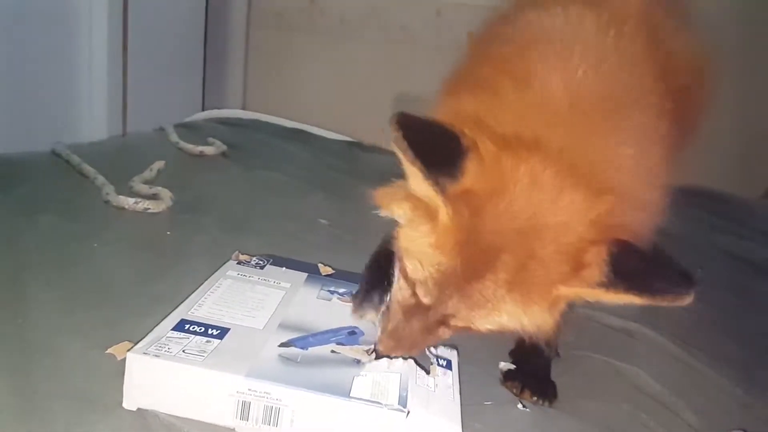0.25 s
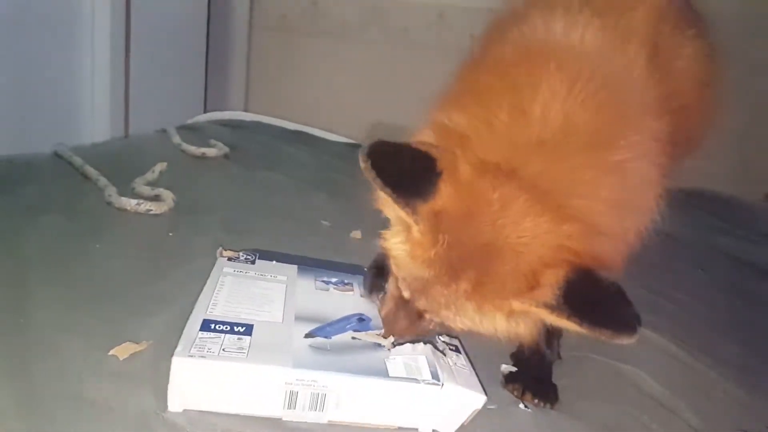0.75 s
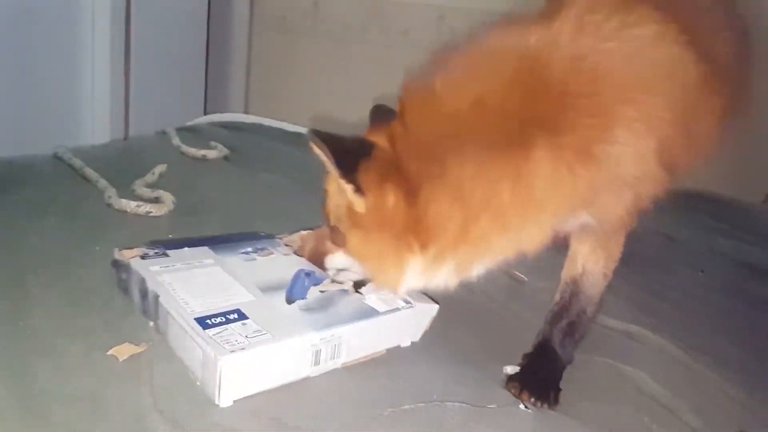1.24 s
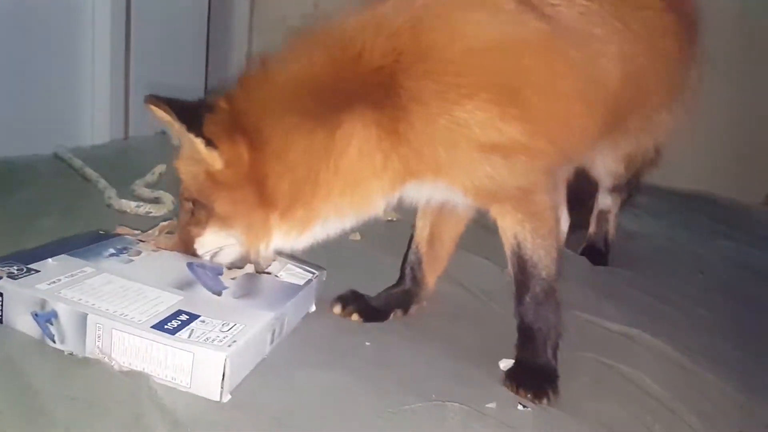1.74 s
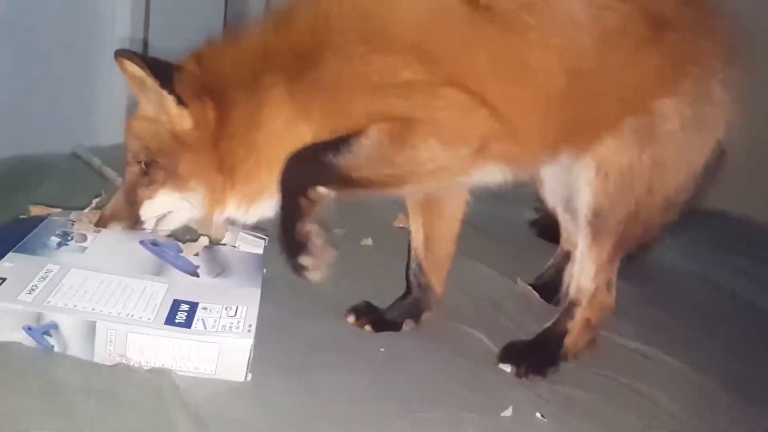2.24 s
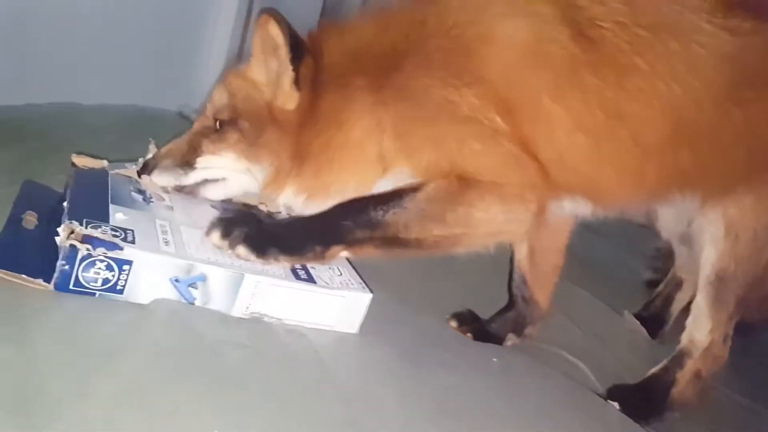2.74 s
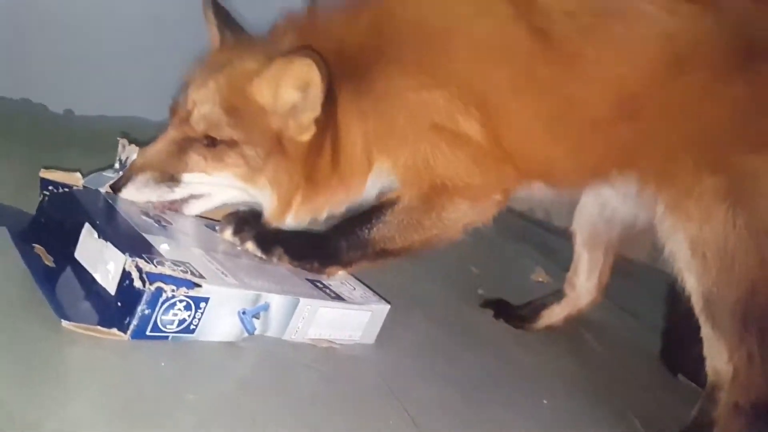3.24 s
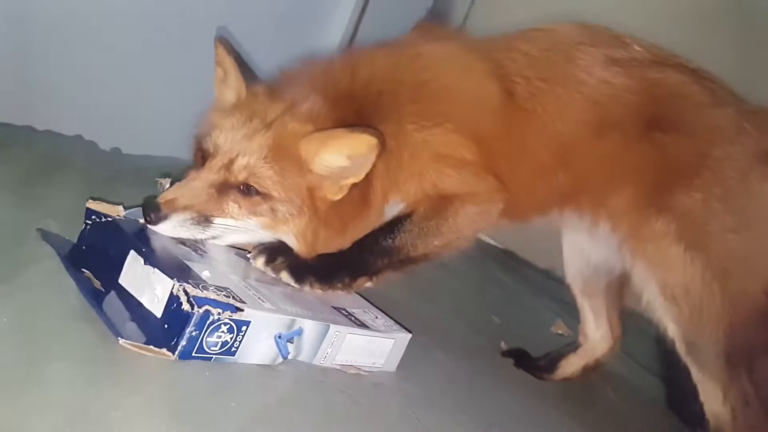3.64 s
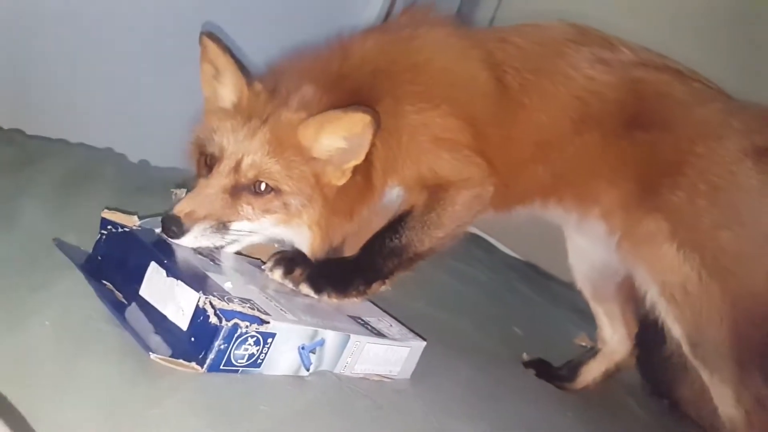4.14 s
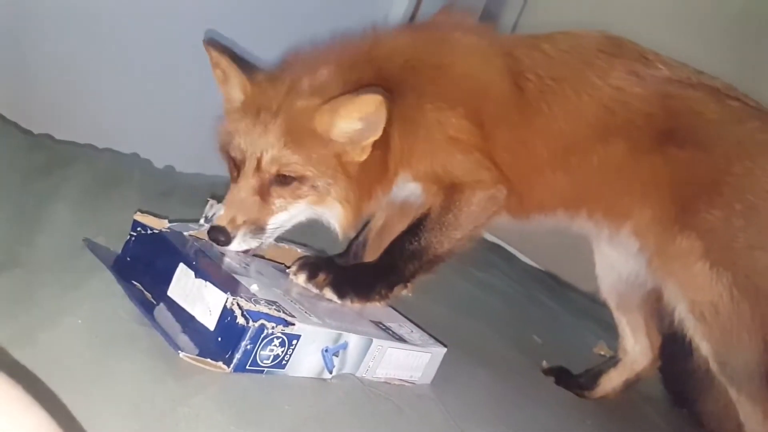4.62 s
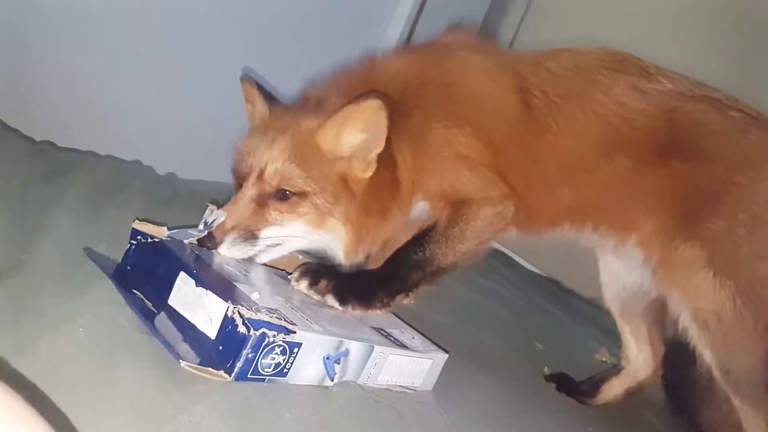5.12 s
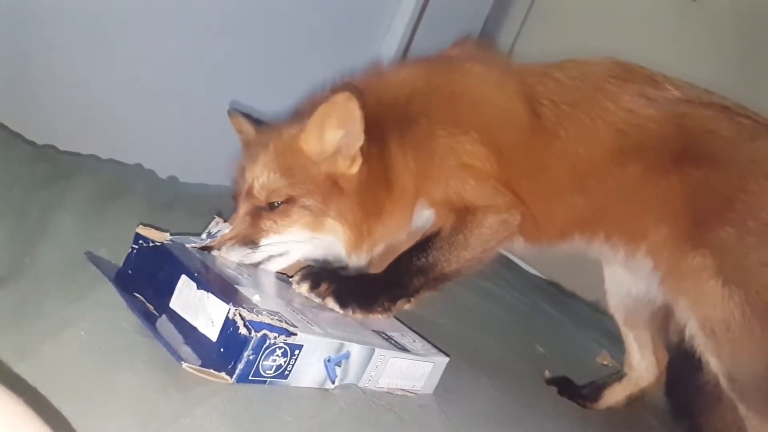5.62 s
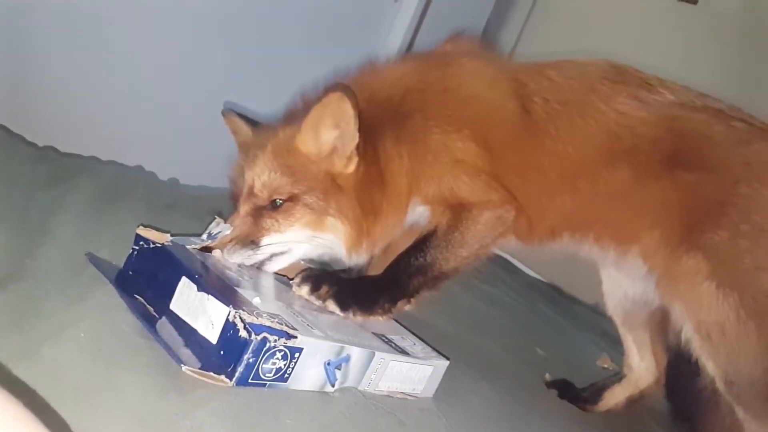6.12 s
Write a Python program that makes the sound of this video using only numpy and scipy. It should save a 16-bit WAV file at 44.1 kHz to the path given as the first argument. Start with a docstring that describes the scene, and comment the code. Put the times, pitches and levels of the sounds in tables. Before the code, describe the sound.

A fox bites into a thin cardboard box, making a quick run of sharp cracks and hollow, creaking crackles. After a lull of soft rubbing, a second burst of snaps follows, then lighter chewing with dull thumps of paws and box on a mattress. Near the end the fox sniffs in short, faint puffs. The microphone is close, in a small, quiet room with a faint hum.

```python
"""Fox with a cardboard box

A fox on a mattress bites, folds and paws a thin cardboard box, close to a two-port phone microphone.
Fibres snap and creak into the box's modes, paws and box thump the mattress, fur and card rub on cloth.
Near the end the fox sniffs in short puffs. The room is small and quiet, with a faint hum."""
import sys
import numpy as np
from scipy import signal
from scipy.fft import rfft, irfft
from scipy.io import wavfile
from scipy.ndimage import uniform_filter1d

SR = 44100
rng = np.random.default_rng(int(sys.argv[2]) if len(sys.argv) > 2 else 0)


def digitize_waveform(pressure):
    """Quantize a signal to 16-bit integers and store it at the path in sys.argv[1].

    Rows of a 2-D input are taken as channels; values are limited to [-1, 1].
    """
    field = np.atleast_2d(pressure).T
    bounded = np.clip(field, -1, 1)
    quanta = np.round(bounded * 32767).astype(np.int16)
    wavfile.write(sys.argv[1], SR, quanta)


N = 280895
FFT_SIZE, SNAP_SAMPLES = 2 ** 19, 2048


def card_snaps():
    """Close up, fibres crack and strike hollow and panel; the tick is louder at the unshaded left port."""
    # (time [s], hollow level [dB], hollow pitch [Hz], panel level [dB], panel pitch [Hz],
    # tick level [dB], left minus right for panel and crack [dB])
    snaps = [(0.1697, -48.5, 377, -46.5, 1700, -66, -7.5), (0.1848, -48.5, 317, -40.5, 2140, -65, -4),
             (0.35, -54, 890, -8.5, 1570, -25, 0.5), (0.353, -37.5, 870, -13, 1565, -32.5, -2.0),
             (0.395, -24.5, 895, -18.5, 1800, -33.5, -8), (0.4381, -12.5, 590, -24, 915, -46, -4),
             (0.4448, -21, 740, -16, 1670, -53, -7), (0.4548, -15, 770, -33, 1320, -43, 1.5),
             (0.4708, -15, 614, -36, 1660, -30.5, 11), (0.4826, -14, 617, -25, 1210.0, -50, 0.0),
             (0.4919, -28, 880.0, -20.5, 923, -41, 8), (0.5059, -12, 590, -14, 1660, -30, -5),
             (0.5147, -35, 775, -13, 860, -30.5, 1), (0.5229, -29, 536, -24, 1350, -32, -2),
             (0.5516, -26, 600, -30, 1980, -46, 6), (0.59, -49, 580.0, -50, 1890, -41, -3),
             (0.6005, -41, 829, -29, 1900, -54, -1), (0.625, -41.5, 373, -49, 1680.0, -39.5, -3),
             (0.6418, -36.5, 584, -33.5, 1800, -38.5, 2), (0.7103, -41, 820.0, -38, 2160, -50.5, -6),
             (0.7511, -60, 750.0, -41.5, 870, -40.5, -3), (0.822, -34, 670, -32, 1060.0, -43, -2),
             (0.844, -52, 620, -48, 1240, -53, 3), (0.8897, -23, 416, -25.5, 1110, -40.5, -10),
             (0.901, -20.5, 387, -26.5, 1350, -50, -6), (0.9399, -25, 336, -22, 1680, -36, 1),
             (0.9593, -17, 776, -22.5, 1780, -40, -9), (0.979, -19, 456, -18.5, 1690, -31.5, 3),
             (1.004, -21.5, 640, -27.0, 930, -39.5, 5), (1.0257, -28, 490, -25.5, 1070, -52, 0.0),
             (1.058, -24.5, 330, -30, 950, -38, -1), (1.166, -45.5, 370.0, -42, 1877, -60, -3.0),
             (1.2874, -62, 736, -49, 1650, -44.5, 1), (1.3177, -64, 263, -53, 1505, -49.5, -13),
             (2.2644, -68, 450.0, -50, 2200, -51, -16), (2.4304, -61, 430.0, -44.5, 1530, -50, -18),
             (2.5467, -34, 310, -38, 1340.0, -54, 0.0), (2.5614, -49, 890, -15.5, 1594, -44, -3.5),
             (2.5704, -40, 340.0, -52, 1470, -60.0, -1.0), (2.677, -43.5, 740, -34.5, 920, -46, -5),
             (2.7555, -30.5, 516, -28, 1300, -67, -2), (2.9445, -24.5, 253, -33.5, 860, -38, -7),
             (2.9605, -19.5, 264, -15.5, 1660, -26, -14), (2.9716, -15, 530, -21.5, 1540, -56, 6),
             (3.1897, -45, 764, -38, 905, -39.5, -7), (3.3229, -47, 304, -36.5, 3830, -49, -9),
             (3.3854, -57, 302, -44, 2060, -42, -5), (3.3993, -29.5, 393, -32, 865, -28, -3.5),
             (3.4447, -28, 374, -43, 1060.0, -66, -4.0), (3.4757, -27, 345, -39.5, 880, -64, 5),
             (3.543, -34.5, 410, -45, 1420, -28, 0), (3.5474, -30.5, 384, -21.5, 1400, -35, -2),
             (3.6035, -46, 820, -41, 1270, -49, -4), (3.716, -35.5, 397, -58, 900.0, -62.0, 3),
             (3.8073, -46, 460, -58, 1690, -45.5, 4), (3.8509, -37, 267, -60, 900.0, -67, -1.0),
             (3.8955, -42.5, 260.0, -51, 1200, -48, -7), (3.9404, -41, 260.0, -54, 900.0, -64, -4.0),
             (3.9893, -39.5, 390, -62, 900.0, -63.0, 0.0), (4.1518, -37, 400, -52, 980, -61, -2.0),
             (4.2087, -40, 545, -51, 900, -55, -7), (4.236, -29.5, 623, -39, 1000, -60, -1),
             (4.3892, -43, 282, -61, 900.0, -67.0, -3), (4.5311, -37, 382, -32, 1290, -53, -6),
             (4.874, -46, 470.0, -54, 1160.0, -72, -11), (4.9244, -55.5, 325, -55, 1310.0, -45, -8.5),
             (5.0528, -69.5, 403, -69.5, 950.0, -55, 1), (5.3787, -48, 349, -48.5, 1640, -54.5, -5),
             (5.7326, -37, 570, -39, 1049, -68, -8.0)]
    out = np.zeros((2, N))
    noises = rng.standard_normal((len(snaps), 4, SNAP_SAMPLES))
    for (s, hollow_db, hollow_hz, panel_db, panel_hz, tick_db, pan_db), noise in zip(snaps, noises):
        hollow = gain_of(hollow_db) * box_knock(hollow_hz, cycles=1.0, ring_share=0.26, detune=noise[0])
        panel = box_knock(panel_hz, cycles=1.98, ring_share=0.22, detune=noise[0, ::-1])
        crack_db = 0.71 * panel_db + 0.46 * tick_db + 4.0  # brittle breaks both tick and crack hard
        card = gain_of(panel_db) * panel + gain_of(crack_db) * fibre_crack(noise[1])
        tick = gain_of(tick_db) * fibre_tick(noise[2:])
        pan = gain_of(pan_db / 2)
        add(out[0], s, hollow * gain_of(-2.0) + card * pan + tick[0] * gain_of(2.0))
        add(out[1], s + 3 / SR, hollow * gain_of(-1.07) + card / pan + tick[1])
    return out


def box_knock(hz, cycles, ring_share, detune):
    """A pulse of a few cycles; the box modes near its pitch ring on after it. Peak 1."""
    # modes of the box: (frequency [Hz], level [dB], t60 before the cap below [s])
    modes = [(410, -16.5, 0.075), (581.5, -3.5, 0.047), (708, -3.5, 0.071), (961, 2, 0.019),
             (1204, -3.5, 0.085), (1416, 5.5, 0.016), (1842, -3, 0.055), (2180, -12, 0.034),
             (2460, -10, .03), (2795, -5, 0.09), (3560, -19.5, .02), (4170, -10.5, .02), (4500, -11.5, .02)]
    t = np.arange(SNAP_SAMPLES) / SR
    ring = 0
    for (mode_hz, db, t60), offset in zip(modes, detune):
        struck_db = db - 7.8 * np.log2(mode_hz / hz) ** 2
        decay = gain_of(struck_db - 60 * t / np.clip(t60, .01, .06))
        ring += decay * np.sin(2 * np.pi * mode_hz * (1 + 0.0492 * offset) * t + 2 * offset)
    pulse = -np.sin(2 * np.pi * hz * t) * np.exp(-t * hz / cycles)
    onset = 1 - np.exp(-t * hz / 0.27)  # the card gives over part of a cycle
    body = (pulse + ring_share * ring) * onset
    return body / abs(body).max()


def fibre_crack(noise):
    """Breaking fibres give a sharp upper-midrange burst."""
    # crack spectrum: (frequency [Hz], level [dB])
    spectrum = [(900, -28.5), (1800, -0.5), (2900, 3.5), (4500, -3.5), (7000, -32.5)]
    return burst(noise, spectrum, quick_s=0.00056, slow_s=0.0072, slow_share=0.13)


def fibre_tick(noise):
    """The bright leading edge of a break."""
    # tick spectrum: (frequency [Hz], level [dB])
    spectrum = [(2500, -28), (4500, -1), (8000, -3.5), (13000, -3), (16000, -14)]
    return burst(noise, spectrum, quick_s=0.0015, slow_s=0.0055, slow_share=0.21)


def card_creak():
    """Small fibre breaks ring hollow and panels; hard tearing crackles more and wakes the stiff edges."""
    # bends and tears: (peak time [s], rise [s], fall [s], hollow level [dB], panel level [dB])
    bends = [(0.19, .04, .04, -53, -55), (0.356, .004, .2, -43, -33), (0.4, .05, .2, -41.5, -35),
             (0.45, .07, 0.2, -30, -34), (0.5, .1, .08, -35, -26.5), (0.63, .15, .15, -46, -55),
             (0.752, .1, .055, -49.5, -49.5), (0.828, 0.024, .1, -55, -68),
             (0.894, 0.027, .13, -29.5, -38.5), (0.958, .2, 0.16, -35, -38),
             (1.03, .2, 0.086, -35.5, -43.5), (1.17, .015, .1, -53, -55.5), (1.483, 0.17, .6, -55.5, -57),
             (2.111, 0.21, .3, -56, -58), (2.42, 0.17, .12, -51.5, -53.5), (2.568, 0.029, .3, -59, -45.5),
             (2.766, 0.25, .075, -37.5, -40.5), (2.85, 0.053, .3, -53, -45.5),
             (2.962, 0.031, .11, -32, -32), (3.199, 0.37, .1, -52, -50), (3.404, 0.11, .1, -46.5, -44.5),
             (3.466, .15, .13, -44.5, -69), (3.562, 0.031, .14, -50, -49), (3.724, .1, .17, -48.5, -58.5),
             (4.003, 0.45, .1, -52, -60), (4.224, 0.14, .2, -45.5, -57), (4.43, 0.062, .3, -55, -67.5),
             (4.54, .012, 0.14, -44.5, -53.5), (4.793, 1, .12, -57.5, -60), (4.92, .15, .08, -64, -63),
             (5.096, 0.13, .03, -66, -71.5), (5.164, 0.066, .1, -63.5, -76.5), (5.338, .1, .15, -66, -71.5),
             (5.611, .04, .05, -65.5, -68.5), (5.738, .05, .07, -60.5, -65), (5.853, .1, .15, -70, -75.5),
             (6.02, .08, .15, -70, -72), (6.102, .1, .06, -68, -67), (6.368, 0.17, .1, -57, -54)]
    # steady strain between bends: (time [s], hollow level [dB], panel level [dB])
    strain = [(0.0, -61, -61), (0.15, -56.5, -62), (0.23, -62.5, -73), (0.33, -63, -65), (0.8, -74, -74),
              (1.15, -72, -64.5), (1.35, -59.5, -61), (1.9, -56, -62), (2.27, -67, -73.5),
              (2.55, -69, -65.5), (3.1, -54, -52.5), (3.65, -58.5, -61), (4.07, -72, -66), (4.4, -60, -72),
              (4.95, -66, -82.5), (5.3, -76, -85), (5.95, -74.5, -88.5), (6.37, -63.5, -73.5)]
    # air in the box, broad faces, folded edges: each (frequency [Hz], width [Hz], level [dB])
    hollow_modes = [(299, 210, 1.5), (469, 161, 1.5), (590, 250, -1), (826, 330, -6)]
    panel_modes = [(1224, 730, 4.5), (1900, 1500, 2)]
    edge_modes = [(2454, 540, 3.5), (2856, 830, -2.5), (4470, 1200, -14)]
    hollow_db, panel_db = swells(strain, bends)
    hiss = np.clip(-.035 * (panel_db + 23.5), .2, 2)
    breaks = patchy(grains(per_s=1000, spread_db=3.5, hiss=hiss), depth_db=2.5)
    hollow = gain_of(hollow_db) * evened(resonate(breaks, hollow_modes))
    panels = evened(resonate(breaks, panel_modes))
    edges = gain_of(-2.43 + 0.15 * (panel_db + 45.5)) * evened(resonate(breaks, edge_modes))
    return hollow + gain_of(panel_db) * (panels + edges)


def mattress_thumps():
    """A quick dent and a slower rebound: the pitch falls as the foam gives."""
    # box and paws landing: (time [s], peak level [dB], final pitch [Hz], left minus right [dB])
    thumps = [(0.06, -47, 103, -26), (0.13, -47, 129, -26), (0.244, -47.5, 86, -29),
              (0.295, -43.5, 105, -29), (0.318, -40, 89.5, -20), (0.469, -39, 110, -17),
              (0.968, -30.5, 105, -5.5), (2.949, -25.5, 128, -1), (3.432, -39, 70, 0.5),
              (3.492, -34.5, 168, 1), (3.844, -41, 113, -1.0), (3.894, -35.5, 107, 3), (3.936, -39, 170, 3),
              (3.944, -34, 105, 2), (3.987, -34.5, 116, 2.0), (4.149, -29.5, 108, 1),
              (4.244, -30.5, 116, 1.5), (4.569, -43, 147, 1.0), (5.143, -47.5, 140, 0.5),
              (6.077, -55.5, 71.6, -17)]
    out, t = np.zeros((2, N)), np.arange(4000) / SR
    for s, db, hz, pan_db in thumps:
        turns = hz * t + 0.26 * (1 - np.exp(-t / 0.0012))
        push = -np.sin(2 * np.pi * turns) * (1 - np.exp(-t / 0.0034)) * np.exp(-t * hz / 0.79)
        push /= abs(push).max()
        add(out[0], s, gain_of(db + pan_db / 2) * push)
        add(out[1], s + 0.00032, gain_of(db - pan_db / 2) * push)
    return out


def rubs_and_sniffs():
    """Fur and card brush over cloth in a fine hiss; near the end the fox sniffs in short puffs."""
    # strokes and sniffs: (peak time [s], rise [s], fall [s], swish level [dB], fuzz level [dB])
    strokes_and_sniffs = [(0.178, 1, 0.062, -73.5, -72), (0.354, .003, 0.37, -61, -57),
                          (0.505, .12, .055, -53, -47), (0.748, .35, 0.039, -62.5, -60),
                          (0.83, .04, 0.05, -76, -63), (0.964, 0.12, 0.15, -56, -55),
                          (1.012, .1, 0.053, -62, -64), (1.29, 0.22, 0.18, -71, -72),
                          (1.481, 0.18, 0.28, -68.5, -63.5), (1.79, 0.53, 0.17, -68, -68),
                          (2.083, 0.22, 0.23, -69.5, -64), (2.426, 0.07, 0.053, -59.5, -58.5),
                          (2.68, 0.24, 0.46, -61.5, -64), (2.842, .015, 0.22, -52.5, -52),
                          (2.89, .1, .12, -50, -55), (2.985, 0.13, 0.12, -53, -53),
                          (3.145, 0.052, 0.048, -57.5, -69), (3.199, 0.17, .3, -69, -61),
                          (3.402, 0.071, 0.073, -59, -57), (3.53, .3, .08, -72, -72),
                          (3.903, .5, 0.65, -69.5, -69.5), (4.224, 0.15, .08, -66.5, -68),
                          (4.492, 0.18, .1, -75, -87), (4.544, 0.062, .3, -74, -69.5),
                          (4.683, 0.11, 0.066, -62.5, -61), (4.793, .12, 0.041, -64, -63),
                          (4.91, 0.059, 0.1, -72, -68.5), (5.051, .04, .05, -72, -91.5),
                          (5.21, 0.052, .05, -77, -92), (5.339, 0.036, .04, -73, -90.5),
                          (5.53, .06, .06, -79.5, -92.5), (5.697, .03, .15, -74.5, -88),
                          (5.736, 0.081, .04, -78, -71), (5.851, .04, 0.028, -80, -92),
                          (6.022, .03, 0.028, -72, -88), (6.19, .025, .02, -71, -88.5),
                          (6.264, 0.034, .3, -67.5, -65), (6.368, 0.15, .1, -60.5, -75)]
    # steady brushing in between: (time [s], swish level [dB], fuzz level [dB])
    brushing = [(0.0, -82, -75), (0.22, -87, -80), (0.55, -84, -71), (1.15, -75, -66), (2.23, -80, -80),
                (2.35, -74, -71), (2.55, -77, -70), (3.3, -67, -63), (3.6, -67, -67), (4.12, -84, -84),
                (4.3, -86, -92.5), (5.0, -91.5, -89.5), (6.37, -92.5, -91)]
    # spectra of the swish and the top-treble fuzz: each (frequency [Hz], level [dB])
    swish = [(2800, -40), (3700, -9), (4600, 0), (5500, -3), (6500, -4), (8000, -6), (9500, -35)]
    fuzz = [(6500, -39), (8500, -1), (10500, -2.5), (12000, -3), (13300, -2), (14500, -5.5), (15800, -11)]
    swish_db, fuzz_db = swells(brushing, strokes_and_sniffs)
    noise = patchy(grains(per_s=900, spread_db=3, hiss=1.8), depth_db=2.5)
    body = gain_of(swish_db) * evened(coloured(noise, swish))
    return body + gain_of(fuzz_db) * evened(coloured(noise, fuzz))


def mattress_rumble():
    """Shifting weight draws a lumpy low rumble from the mattress."""
    # weight shifts: (time [s], level [dB])
    shifts = [(0.0, -51), (0.48, -55), (0.65, -47.5), (0.99, -69), (1.19, -54), (1.38, -77), (1.86, -65),
              (2.31, -63.5), (2.57, -52.5), (3.03, -49.5), (3.46, -69), (3.6, -53.5), (3.97, -58),
              (4.2, -53), (4.91, -68), (5.57, -75.5), (6.37, -59.5)]
    # mattress spectrum: (frequency [Hz], level [dB])
    spectrum = [(25, -19), (45, -12), (70, -1), (100, 0), (150, -4), (220, -9.5), (350, -33.5), (1000, -70)]
    lumps = grains(per_s=55, spread_db=7.0, hiss=1.0)
    return gain_of(follow(shifts)[0]) * evened(coloured(lumps, spectrum))


def room_reflections(x):
    """Near walls: sparse reflections of random sign in two sets, each band dying at its own speed."""
    # room decay: (frequency [Hz], t60 [s])
    decay = [(200, 0.29), (1000, 0.24), (3000, 0.26), (10000, 0.2)]
    count = SR // 40
    taps = np.zeros((2, 20 * count + 200))
    arrivals = 130 + np.arange(count) * 20 + rng.integers(0, 20, (2, count))
    np.put_along_axis(taps, arrivals, rng.choice([-1., 1.], arrivals.shape), 1)
    hz, t, bands = signal.stft(taps, SR, nperseg=256)
    tail = signal.istft(bands * gain_of(-60 * t / read(decay, hz)[:, None]), SR, nperseg=256)[1]
    return signal.fftconvolve(x.mean(0)[None], tail / np.linalg.norm(tail[0]), axes=1)[:, :N]


def room_tone(air_db=-61.5, hum_db=-72, hum_hz=138.3):
    """Room air, microphone hiss and a faint wavering hum."""
    # noise floor: (frequency [Hz], level [dB])
    spectrum = [(20, -6), (60, -3), (85, -19), (143, -6), (230, -19.5), (450, -17.5), (630, -22.5),
                (1500, -29), (3000, -30.5), (5000, -35.5), (7700, -42.5), (10000, -40.5), (13200, -39),
                (15800, -44)]
    hum = evened(resonate(rng.standard_normal(N), [(hum_hz, 14, 0)]))
    air = evened(coloured(rng.standard_normal((2, N)), spectrum))
    return gain_of(air_db) * air + gain_of(hum_db) * hum


def microphone_ports(pair, lag_samples=7):
    """The left port hears the first signal; the right hears it later, blended with the second."""
    # likeness of the ports, low in the treble: (frequency [Hz], coherence [0-1])
    likeness = [(30, 0.4), (100, 0.8), (400, 0.95), (1000, .85), (2500, 0.28), (6000, 0.1), (15000, 0.12)]
    # port balance: (frequency [Hz], left minus right [dB])
    balance = [(60, -1), (180, -0.5), (550, 0), (1650, -4), (4970, -2.5), (15000, 2)]
    hz = np.fft.rfftfreq(FFT_SIZE, 1 / SR)
    first, second = rfft(pair, FFT_SIZE)
    same = np.clip(read(likeness, hz), 0, 1)
    lean = gain_of(read(balance, hz) / 2)
    delayed = first * np.exp(-2j * np.pi * hz * lag_samples / SR)
    right = same * delayed + np.sqrt(1 - same ** 2) * second
    return irfft(np.array([first * lean, right / lean]))[:, :N]


def burst(noise, spectrum, quick_s, slow_s, slow_share):
    """Coloured noise that rises within a millisecond and dies in two stages. Peak 1."""
    t = np.arange(SNAP_SAMPLES) / SR
    hz = np.fft.rfftfreq(SNAP_SAMPLES, 1 / SR)
    shape = (1 - np.exp(-t / 0.0003)) * (np.exp(-t / quick_s) + slow_share * np.exp(-t / slow_s))
    x = irfft(rfft(noise) * gain_of(read(spectrum, hz))) * shape
    return x / abs(x).max(-1, keepdims=True)


def grains(per_s, spread_db, hiss):
    """Two unrelated trains of tiny clicks, a few of them large, over a bed of hiss."""
    size_db = spread_db * np.minimum(rng.exponential(1, (2, N)), 4)
    sizes = gain_of(size_db) * rng.standard_normal((2, N))
    clicking = rng.random((2, N)) < per_s / SR
    return evened(sizes * clicking) + hiss * rng.standard_normal((2, N))


def patchy(x, depth_db):
    """Bands some hundred Hz wide swell and fade over a tenth of a second, as with a moving contact."""
    bands = signal.stft(x, nperseg=512)[2]
    patches = uniform_filter1d(rng.standard_normal(bands.shape[1:]), size=5, axis=0)
    patches = uniform_filter1d(patches, size=16, axis=1)
    return signal.istft(bands * gain_of(depth_db * evened(patches)), nperseg=512)[1][:, :N]


def swells(steady, events, swell_db=20):
    """Two steady levels in dB plus events, each moving swell_db over its rise or fall; powers add."""
    t = np.arange(0, N + 40, 40) / SR
    s, rise_s, fall_s, *peak_db = np.transpose(events)[:, :, None]
    away = np.where(t < s, (s - t) / np.maximum(rise_s, .003), (t - s) / np.maximum(fall_s, .003))
    powers = (gain_of(np.array(peak_db) - swell_db * np.minimum(away, 5)) ** 2).sum(1)
    return [10 * np.log10(gain_of(base_db) ** 2 + np.interp(np.arange(N) / SR, t, power))
            for base_db, power in zip(follow(steady), powers)]


def resonate(x, modes):
    """Sum of steep resonances of alternating sign: two poles, passed twice."""
    out = 0
    for k, (hz, width, db) in enumerate(modes):
        r = np.exp(-np.pi * width / SR)
        section = [1 - r, 0, -r * (1 - r), 1, -2 * r * np.cos(2 * np.pi * hz / SR), r * r]
        out = out + (-1) ** k * gain_of(db) * signal.sosfilt([section, section], x)
    return out


def coloured(x, spectrum):
    hz = np.fft.rfftfreq(FFT_SIZE, 1 / SR)
    return irfft(rfft(x, FFT_SIZE) * gain_of(read(spectrum, hz)))[..., :N]


def gain_of(db):
    return 10 ** (np.asarray(db) / 20)


def evened(x):
    """Scaled to an RMS of 1."""
    return x / np.sqrt(np.mean(x ** 2) + 1e-20)


def read(points, hz):
    """A curve's value at hz, on a log frequency axis."""
    f, value = np.transpose(points)
    return np.interp(np.log(hz + 1), np.log(f + 1), value)


def follow(rows):
    """Timed rows as one sample-by-sample curve per column."""
    s, *columns = np.transpose(rows)
    return [np.interp(np.arange(N) / SR, s, column) for column in columns]


def add(mix, s, sound):
    part = mix[round(s * SR):][:len(sound)]
    part += sound[:len(part)]


def scene():
    """Snaps and thumps up front, softer sounds around them; only the snaps excite the room."""
    snaps = card_snaps()
    reflections = gain_of(-8.5) * room_reflections(snaps)
    bed = reflections + card_creak() + rubs_and_sniffs() + mattress_rumble() + room_tone()
    return snaps + mattress_thumps() + microphone_ports(bed)


def record(dry):
    """The microphone drops the deepest bass; a steep band limit cuts the top treble."""
    low_hz, high_hz = 30.0, 15850
    thin = signal.sosfilt(signal.butter(1, low_hz, "high", fs=SR, output="sos"), dry)
    band_limit = signal.firwin(511, high_hz, window=("kaiser", 9), fs=SR)
    return signal.oaconvolve(thin, band_limit[None], "same")


dry = scene()
out = record(dry)
digitize_waveform(out)
```